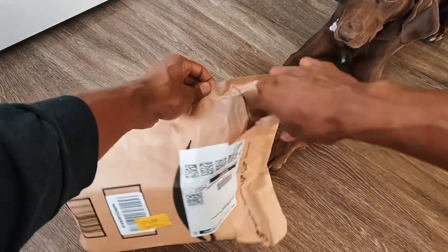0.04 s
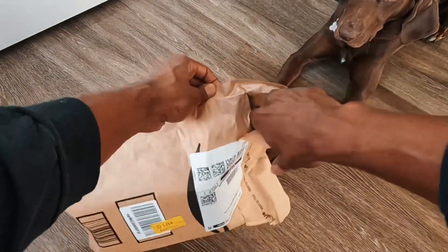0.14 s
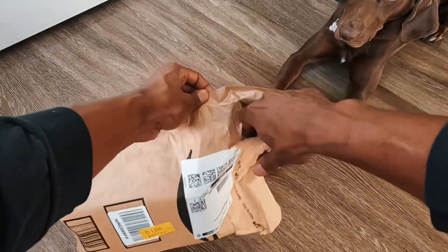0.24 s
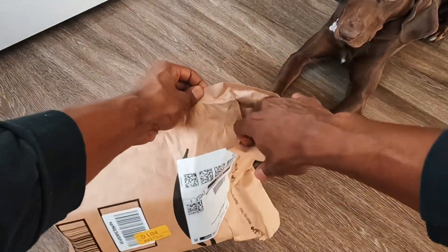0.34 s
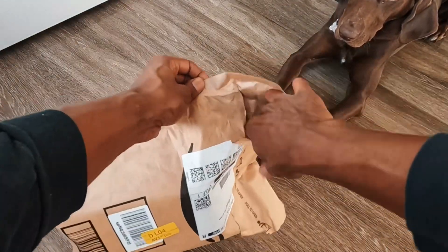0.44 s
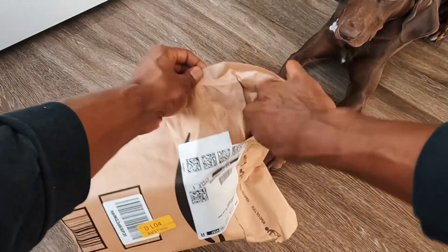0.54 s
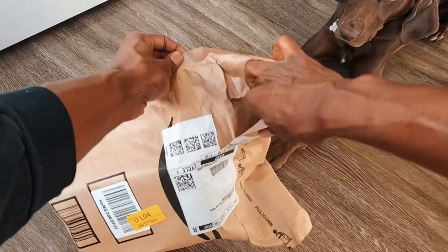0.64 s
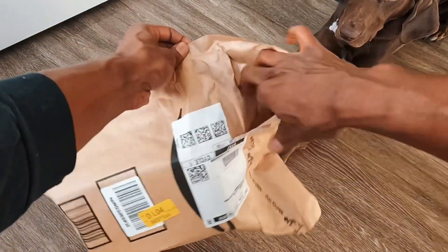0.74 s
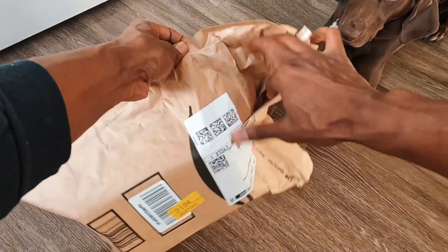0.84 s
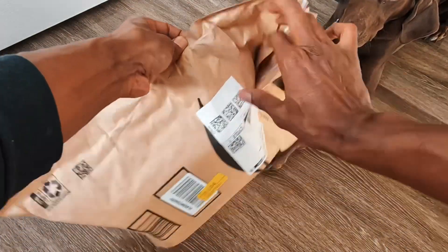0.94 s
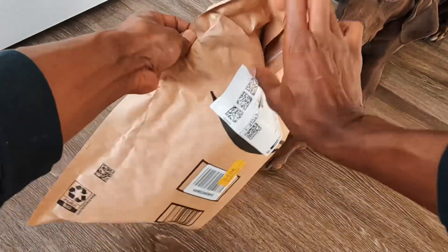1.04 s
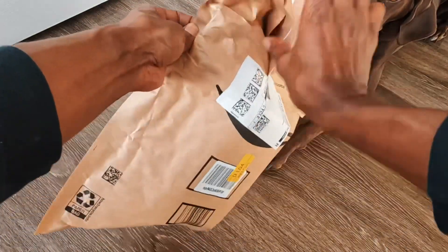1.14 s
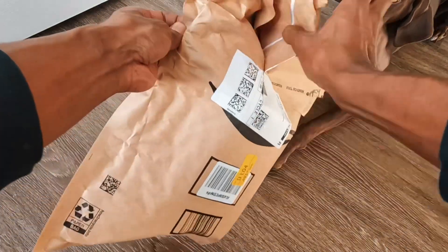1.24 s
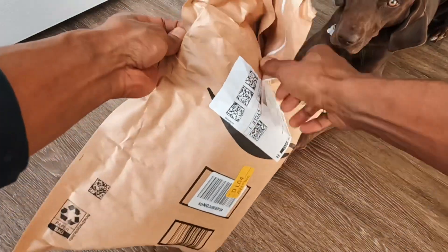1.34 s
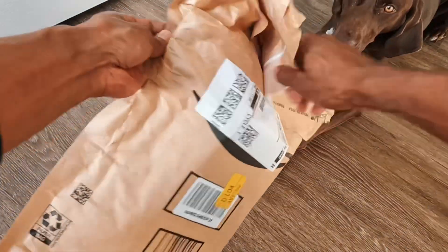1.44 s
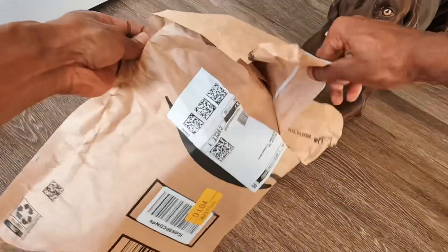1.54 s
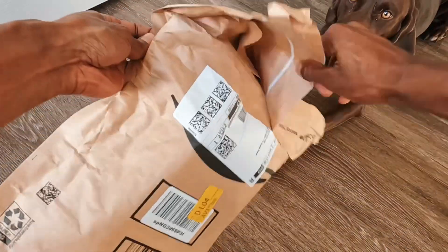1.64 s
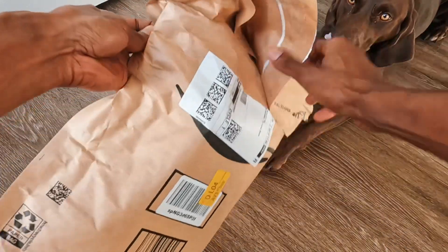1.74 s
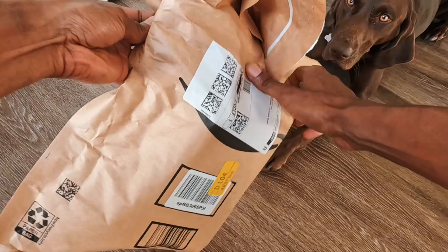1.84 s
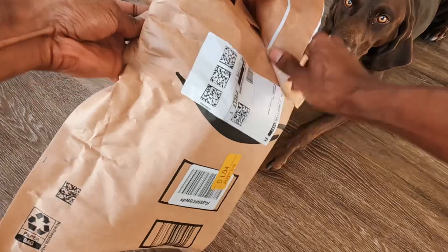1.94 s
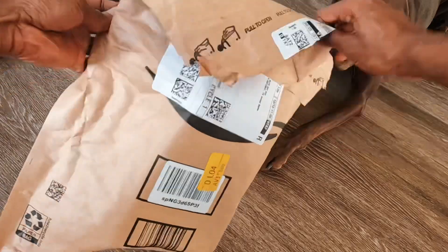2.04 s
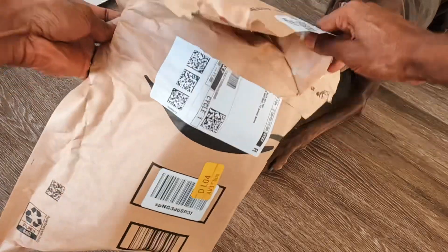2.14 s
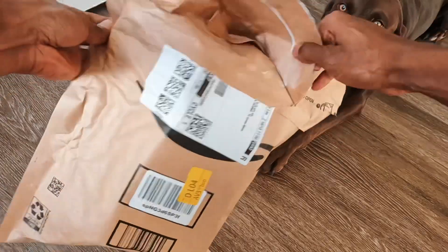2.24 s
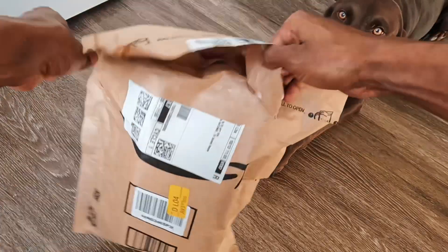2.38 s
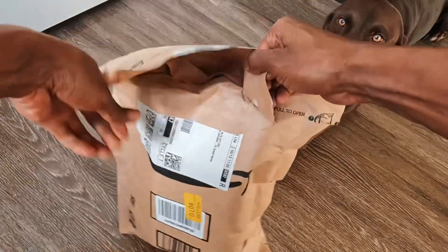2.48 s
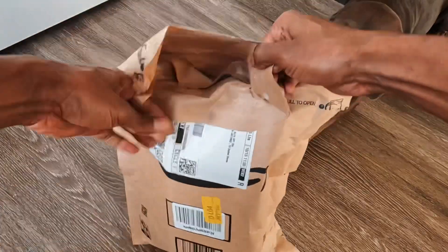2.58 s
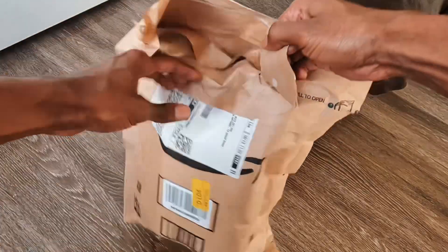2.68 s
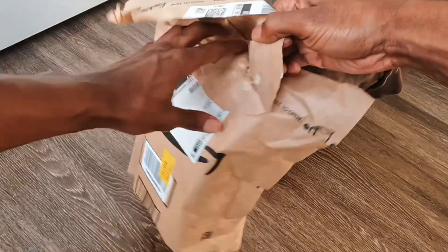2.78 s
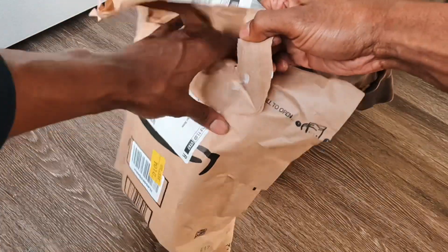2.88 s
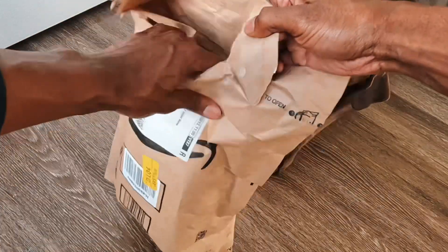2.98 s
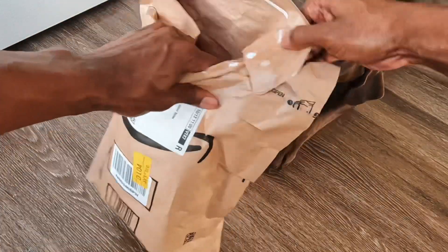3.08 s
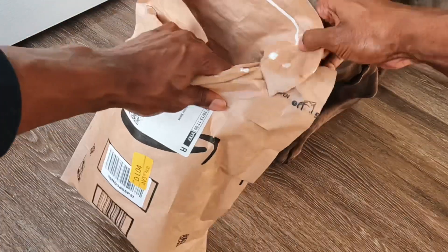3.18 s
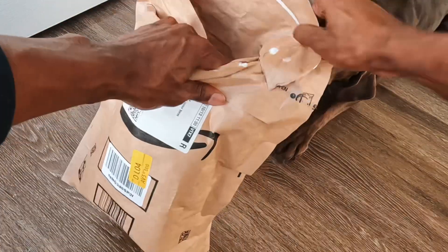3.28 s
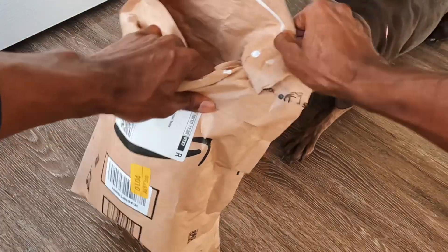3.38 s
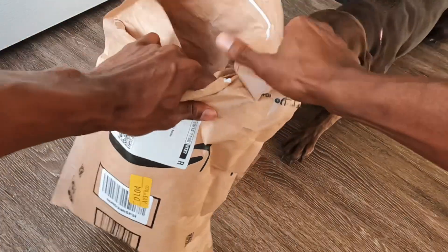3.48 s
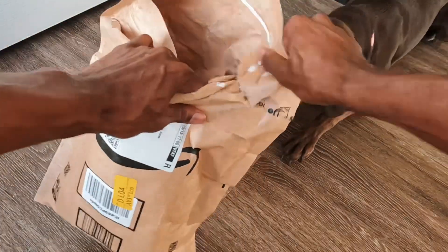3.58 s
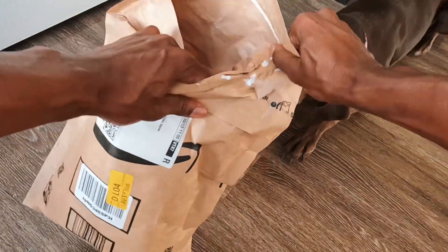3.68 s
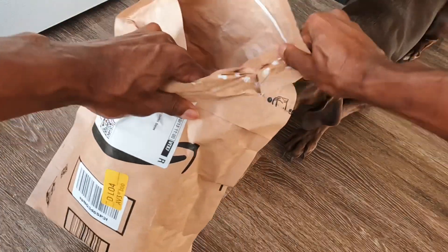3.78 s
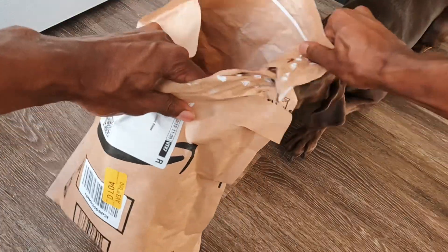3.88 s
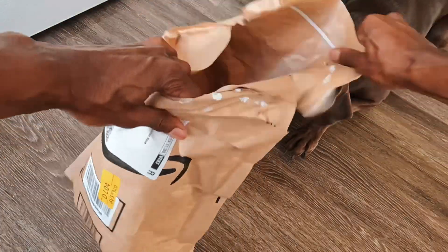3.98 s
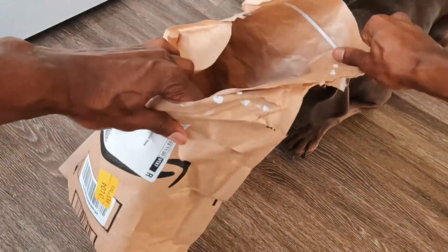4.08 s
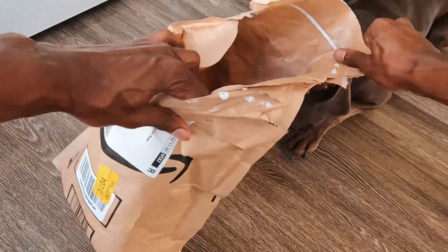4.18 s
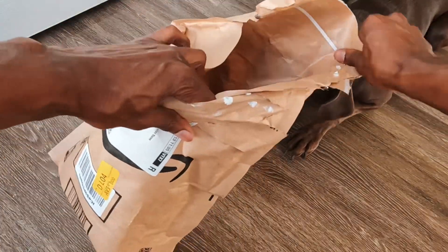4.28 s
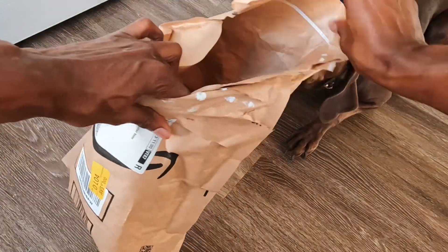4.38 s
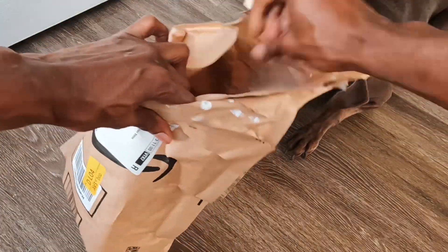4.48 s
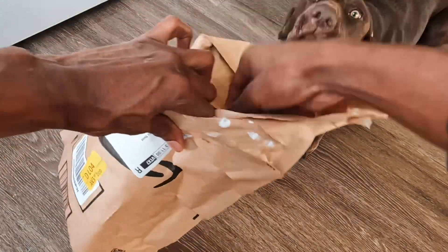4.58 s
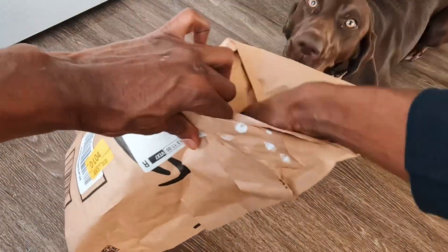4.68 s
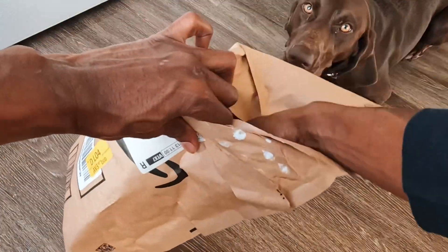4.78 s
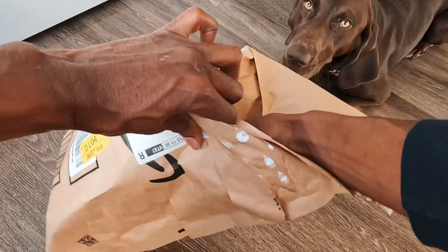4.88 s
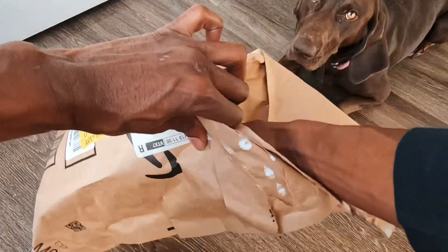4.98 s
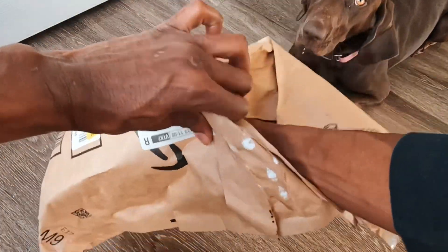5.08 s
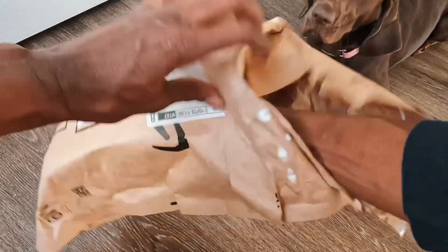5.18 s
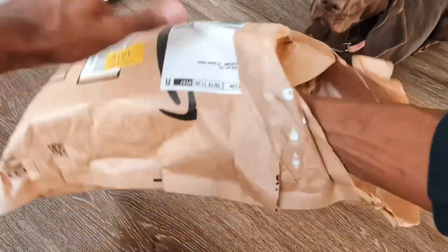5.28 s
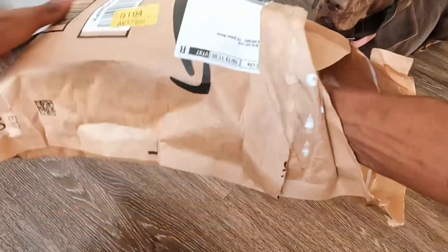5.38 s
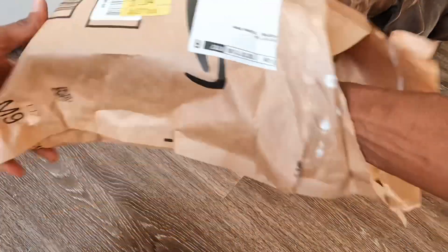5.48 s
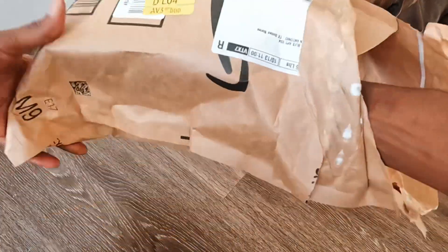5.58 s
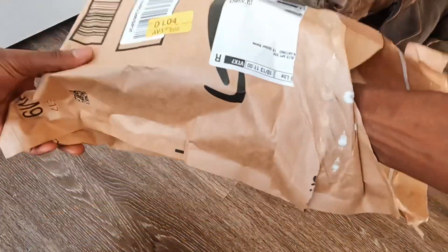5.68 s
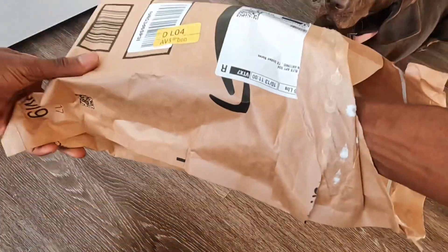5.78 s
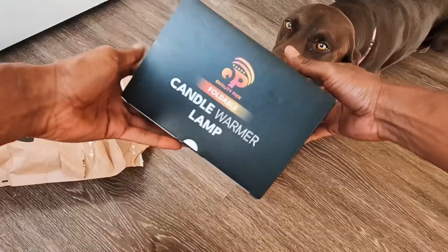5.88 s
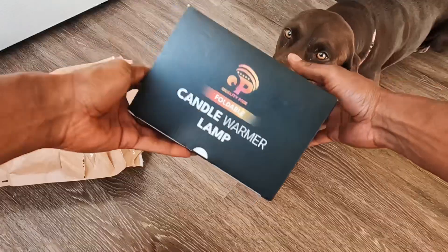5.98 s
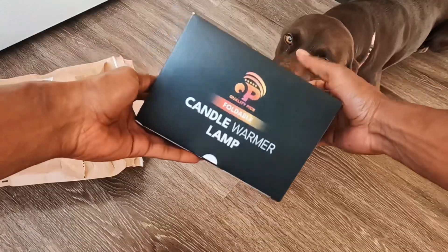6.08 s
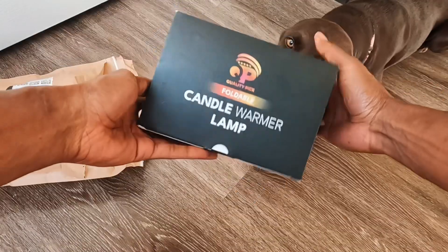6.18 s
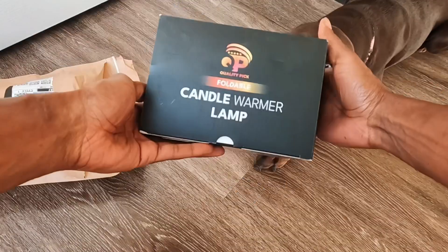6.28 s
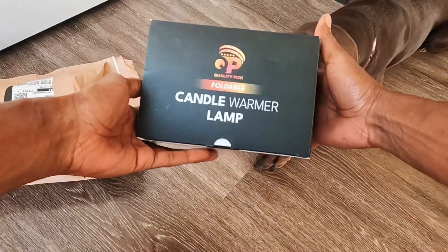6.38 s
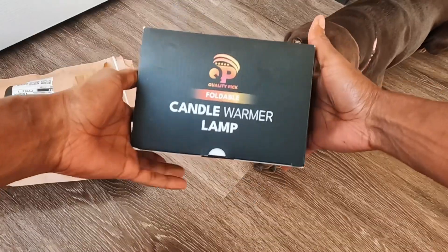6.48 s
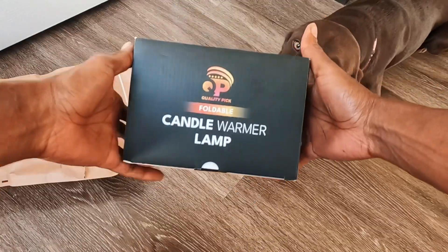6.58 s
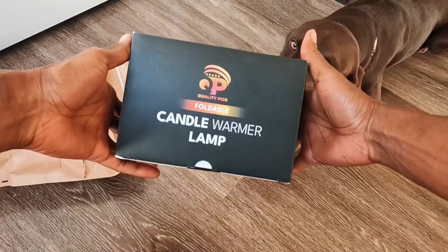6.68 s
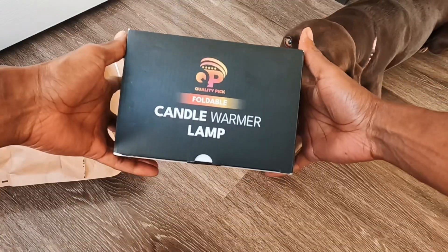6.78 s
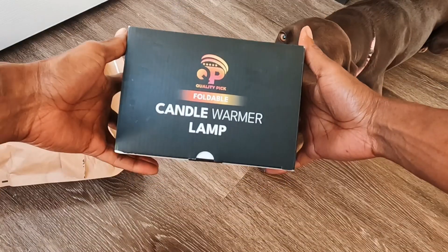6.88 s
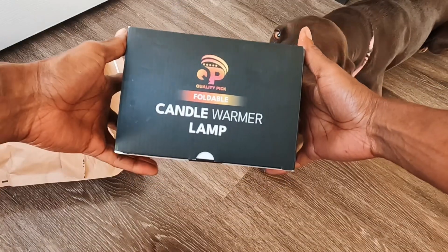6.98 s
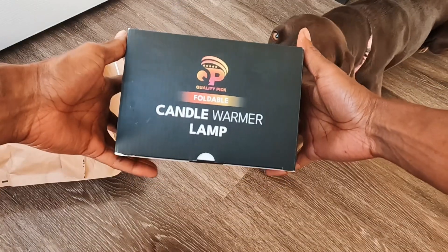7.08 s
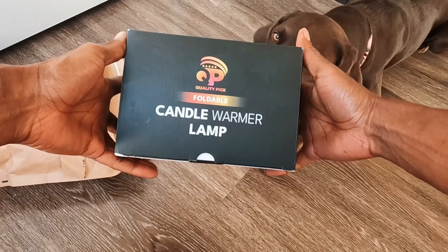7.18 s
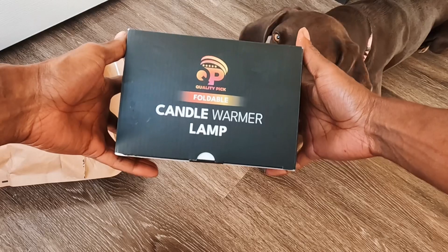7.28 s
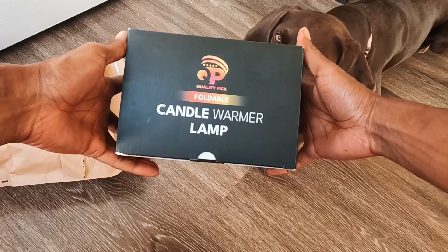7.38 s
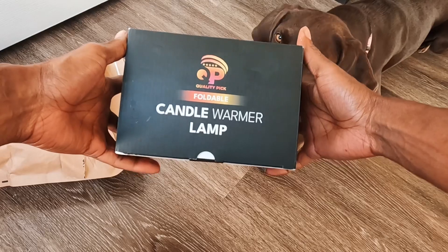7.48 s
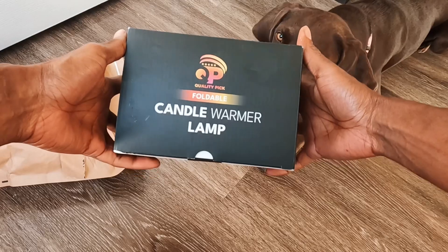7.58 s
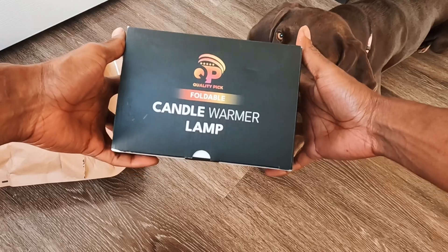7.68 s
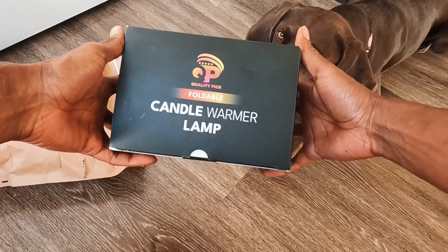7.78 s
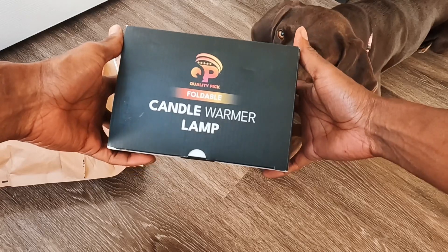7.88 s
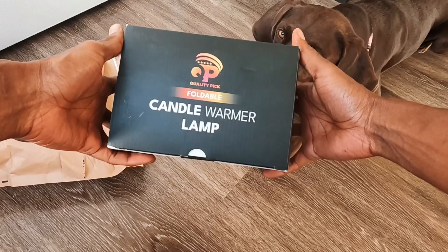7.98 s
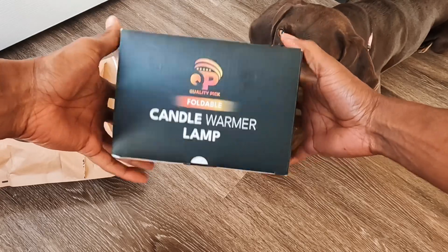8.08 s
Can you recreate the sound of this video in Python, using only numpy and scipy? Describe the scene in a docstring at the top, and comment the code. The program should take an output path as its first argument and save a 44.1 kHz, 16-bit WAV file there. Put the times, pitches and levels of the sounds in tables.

```python
"""Paper rustles and creases snap, close up in a quiet living room, over the low rumble of the air.
A stiff mailer is ripped open in short pulls (dense crackles of parting fibres) while its panels thud.
A hand rummages inside and draws out a cardboard box, which knocks once against the pouch;
then fingers slide and tap on the box. Sliding is noise and tiny clicks; snaps, thuds and taps are
short jolts that ring resonances."""
import sys
import numpy as np
from scipy import signal
from scipy.fft import rfft, irfft, next_fast_len
from scipy.io import wavfile

SR = 44100
rng = np.random.default_rng(int(sys.argv[2]) if len(sys.argv) > 2 else 0)


def materialize(psi):
    """Save the field psi as 16-bit PCM at rate SR to the path in sys.argv[1].

    A 1-D psi becomes a single channel; in a 2-D psi each row is a channel.
    """
    bounded = np.clip(np.atleast_2d(psi).T, -1, 1)
    quanta = np.round(bounded * 32767).astype(np.int16)
    wavfile.write(sys.argv[1], SR, quanta)


N = 358533
TIME = np.arange(N) / SR

# Hand strokes. Level is that of the middle band; body (lows) and brightness (highs) are relative to it.
# Each layer adds its own small trim later.
# pulls that tear the paper:
# (start [s], length [s], level [dB], swell over the pull [dB], body [dB], brightness [dB])
RIP_PULLS = [(0.597, 0.14, -28.5, -5, -8.5, -4.5), (1.508, 0.069, -23.5, 2.5, -6.5, -3.5),
             (1.992, 0.06, -31, 3, -10, -2), (2.057, 0.029, -23, 1, -6.5, -3),
             (3.013, 0.14, -30, 5, -12, -1.5), (3.197, 0.065, -31.5, -1, -5, 2),
             (3.626, 0.04, -29, 9.5, -14, -0.5), (3.781, 0.13, -28, 5, -10, -2),
             (3.964, 0.094, -25.5, -4.5, -3.5, -0.5)]
# hand movements that bend and rub the paper:
# (start [s], length [s], level [dB], swell [dB], body [dB], brightness [dB])
RUSTLE_STROKES = [(0.002, 0.13, -42, 6, -11, -8), (0.143, 0.14, -40.5, 0, -7, -6.5),
                  (0.336, 0.21, -36.5, -1, -5.5, -4.5), (0.748, 0.23, -41, -2, -0.5, -3),
                  (1.037, 0.14, -45.5, -9.5, -5, -7), (1.235, 0.092, -40.5, -11, -5, -2),
                  (1.357, 0.099, -48, -5.5, -3, 3), (1.619, 0.19, -43, -10.5, 0, -5),
                  (1.901, 0.054, -42.5, -5, 7.5, -5), (2.149, 0.19, -43.5, -13.5, -17, -6.5),
                  (2.345, 0.12, -39, 1.5, -3.5, 0), (2.525, 0.1, -40, -2.5, -3.5, 3),
                  (2.68, 0.047, -37.5, 0.5, 2, -1), (2.75, 0.032, -35.5, 2.5, 1, 3),
                  (2.82, 0.18, -36, -1.5, -3, -6.5), (3.27, 0.31, -42.5, -0.5, -7, -6.5),
                  (3.699, 0.042, -36, -6.5, -4.5, -7), (4.114, 0.16, -44, -5, -1, -1.5),
                  (4.305, 0.15, -46.5, 4, -1, -0.5), (4.538, 0.075, -42.5, -4, 1, 2.5),
                  (4.694, 0.13, -33, -2, -5, -6.5), (4.855, 0.2, -45, -1, 0, -6),
                  (5.075, 0.087, -39.5, -5.5, -4, -6.5), (5.19, 0.034, -36.5, 5.5, -1.5, -2),
                  (5.272, 0.13, -47.5, -7, 1.5, -3.5), (5.48, 0.11, -40.5, 13, 0.5, -2),
                  (5.64, 0.065, -37, 14, -4.5, -4), (5.753, 0.055, -40, 0, -3.5, -8.5)]
# fingers sliding on the box:
# (start [s], length [s], level [dB], swell [dB], body [dB], brightness [dB])
BOX_SLIDES = [(5.86, .04, -69, -8, -6, 16), (5.93, 0.17, -62.5, -5, -8, -5.5),
              (6.106, 0.032, -47, -4.5, -19, -3.5), (6.165, 0.056, -58, 3, -6, 5),
              (6.25, .015, -52.5, 2, -10, -7), (6.29, 0.13, -61, -2, -6, 0.5),
              (6.42, 0.23, -63.5, 11, -4, 7.5), (6.655, 0.11, -58.5, -3, 6, -7),
              (6.765, 0.006, -63.5, -11, 5, 8), (6.94, 0.042, -65.5, 0, -4, 0),
              (8.04, 0.1, -65, 9, -11, -2)]

# large creases snapping through, levels before the layer trim:
# (time [s], pouch pop [dB], crease crack [dB], crease pitch [Hz])
CREASE_SNAPS = [(0.1287, -26, -34, 2800), (0.1403, -28, -24, 5170), (0.1696, -23.5, -29.5, 4370),
                (0.177, -27, -29, 4300), (0.185, -41, -42, 5000), (0.206, -25, -30.5, 6000),
                (0.2174, -27, -41, 2600), (0.2273, -26, -28, 3520), (0.2337, -31, -33, 2840),
                (0.2946, -24, -34, 3630), (0.3277, -20, -27.5, 4300), (0.344, -27, -27.5, 3980),
                (0.402, -22.5, -25, 4950), (0.493, -24, -28.5, 5370), (0.575, -26.5, -34.5, 4800),
                (0.61, -27.5, -32.5, 4000), (0.627, -25, -30.5, 3500), (0.706, -30, -31, 5240),
                (0.6554, -15, -21, 4100), (0.7274, -24, -49, 5600), (0.782, -28.5, -34, 2910),
                (0.7927, -29, -32, 3000), (0.842, -28.5, -35, 3370), (0.8983, -28.5, -36, 3400),
                (0.917, -29, -32, 2590), (1.0225, -31, -32.5, 3050), (1.039, -21, -22.5, 5130),
                (1.046, -31, -22, 6560), (1.189, -21, -25.5, 5640), (1.209, -24.5, -32, 4370),
                (1.2157, -29.5, -20, 3480), (1.2436, -30.5, -44, 6100), (1.2547, -29.5, -20.5, 3770),
                (1.271, -24, -43.5, 2600), (1.2876, -26.5, -30.5, 3700), (1.431, -29, -38.5, 7500),
                (1.4706, -35, -37, 2670), (1.53, -26, -24.5, 4300), (1.581, -23, -28, 2580),
                (1.678, -27.5, -48, 3700), (1.8333, -22.5, -30, 3860), (1.841, -32.5, -38.5, 2400),
                (1.886, -25, -30, 2950), (1.893, -21, -25.5, 5200), (1.9433, -24.5, -28, 2970),
                (1.97, -37, -26, 4320), (1.9889, -29.5, -30.5, 3020), (2.02, -31.5, -26.5, 4500),
                (2.323, -32, -30.5, 3280), (2.3606, -23, -44, 4340), (2.448, -42, -23, 2500),
                (2.467, -25, -21.5, 4050), (2.531, -46, -33, 5630), (2.542, -45, -35, 3170),
                (2.6363, -23, -31, 2620), (2.6438, -23, -30.5, 3800), (2.676, -26.5, -26, 2540),
                (2.6863, -26.5, -26, 3900), (2.7006, -19, -33, 3770), (2.712, -20.5, -36, 2400),
                (2.7187, -24.5, -39, 3350), (2.7312, -20, -26, 3670), (2.7887, -21.5, -30, 4470),
                (2.8305, -18, -23, 2800), (2.9062, -26, -29.5, 3870), (2.935, -20.5, -24.5, 2960),
                (2.949, -34, -28.5, 3770), (2.9622, -27.5, -34, 5560), (3, -25, -30, 2400),
                (3.033, -32, -22, 2540), (3.0563, -20.5, -27, 2400), (3.1212, -18.5, -32, 3400),
                (3.133, -19, -31, 4350), (3.227, -18.5, -27, 3620), (3.246, -27.5, -27.5, 4200),
                (3.28, -22, -26.5, 2960), (3.3357, -32.5, -22.5, 3330), (3.347, -30, -20, 3300),
                (3.3699, -46, -29.5, 2500), (3.412, -46, -32, 5140), (3.4338, -46, -36.5, 6400),
                (3.4774, -26.5, -22, 3260), (3.5664, -30, -33, 2460), (3.628, -21, -27.5, 3120),
                (3.672, -22, -23, 2840), (3.8117, -19, -38, 2600), (3.835, -26, -30, 3000),
                (3.865, -28, -26, 4200), (3.871, -19.5, -30.5, 3000), (4.072, -19, -29, 3500),
                (4.2483, -30.5, -32.5, 3700), (4.4524, -27, -34, 4360), (4.586, -24, -44, 2680),
                (4.7387, -27, -33.5, 2404), (4.756, -24, -36, 2600), (4.814, -28.5, -35, 3000),
                (5.0972, -35, -24.5, 3740), (5.212, -35, -28.5, 3530), (5.347, -35, -39, 3020),
                (5.447, -32.5, -40, 3260), (5.451, -28, -32.5, 3360), (5.5767, -29, -21.5, 5040),
                (5.581, -23, -28, 3400), (5.5881, -25.5, -33, 4170), (5.6957, -26, -25, 3860),
                (5.7077, -21, -23.5, 4230), (5.718, -30, -21, 3430), (5.7445, -32, -43, 2500),
                (5.771, -27, -32, 2660), (5.803, -45, -38, 2400), (5.82, -28.5, -47, 2400),
                (5.828, -62, -33, 3876), (5.8423, -27, -24.5, 4830), (5.85, -59, -39, 3600)]
# whole panels of the pouch buckling, peaks before the layer trim: (time [s], peak [dB], pitch [Hz])
PANEL_THUDS = [(1.214, -18, 192), (1.223, -18.5, 57.5), (1.391, -22, 242), (1.552, -17.5, 123),
               (1.582, -18, 200), (1.609, -15.5, 362), (1.68, -13.5, 188), (1.843, -23.5, 260),
               (1.894, -21.5, 290), (1.97, -19.5, 215), (2.021, -17, 205), (2.062, -20, 227),
               (2.099, -15.5, 155), (2.467, -23.5, 235), (2.6428, -22, 298), (2.7133, -17, 285),
               (2.732, -24, 328), (2.829, -18, 170), (3.154, -23, 252), (3.495, -26, 260),
               (3.597, -24.5, 248), (3.897, -16.5, 200), (3.984, -20, 193), (4.039, -15.5, 52.4),
               (4.452, -29.5, 149), (4.545, -23, 250), (4.585, -21.5, 230), (4.748, -18.5, 332),
               (5.584, -17, 65.6), (5.72, -24, 259), (5.743, -21, 139)]
# the carton knocks the pouch, then fingertips touch it:
# (time [s], peak [dB], pitch [Hz], top of the contact [Hz])
BOX_TAPS = [(5.4697, -11, 1160, 2550), (6.213, -37, 1250, 5000), (6.247, -37, 3220, 9000),
            (6.288, -40, 1260, 6000), (6.33, -41, 1500, 6000), (6.439, -40.5, 695, 1100),
            (6.597, -38, 1240, 2200), (6.6147, -28.5, 1290, 3980), (6.6368, -27.5, 1230, 9000),
            (6.639, -25, 1230, 6000), (6.745, -41, 1020, 3006), (7.906, -40, 1113, 11030)]

# resonances of the pouch, later stretched to follow its main pitch: (frequency [Hz], width [Hz], gain [dB])
POUCH_RESONANCES = [(240, 74, -3), (632, 230, -6), (1110, 254, 1), (1706, 1020, -3.5), (2083, 1570, -10)]
# resonances of a pouch panel: (frequency [Hz], width [Hz], gain [dB])
PANEL_RESONANCES = [(103, 58, 4), (201, 56, 6.5), (248, 19, 5.5), (384.4, 110, -6)]
# resonances of the carton: (frequency [Hz], width [Hz], gain [dB])
BOX_RESONANCES = [(583, 360, 8.5), (1220, 230, -13), (2600, 700, 1.5), (4300, 2100, 10.5),
                  (6860, 2600, 12.5)]
# main resonance of the pouch as its hollow changes shape: (time [s], frequency [Hz])
POUCH_PITCH_CURVE = [(0, 1360), (.75, 1335), (1.2, 1185), (2.1, 1130), (2.7, 1090), (3.2, 1255),
                     (4.0, 1100), (4.75, 1220), (5.5, 1212)]
# taut paper hardly moves the low modes of the pouch, slack paper does: (time [s], low-mode gain [dB])
SLACK_CURVE = [(0, -0.5), (1.3, -2.5), (1.9, 2), (2.8, 2.5), (3.3, -4), (3.8, 5), (4.6, 4.5), (5.8, -6)]

# relative spectrum of the tear: (frequency [Hz], density [dB])
RIP_SPECTRUM = [(35, -31.5), (60, -4.5), (129, -5), (219, 0.5), (503, -7), (695, -3.5), (855, -6),
                (1210, -3.5), (1880, -6), (2150, -5.5), (2360, -7.5), (3580, -4.5), (7500, -9),
                (11400, -19), (15000, -33)]
# relative spectrum of the bending paper: (frequency [Hz], density [dB])
RUSTLE_SPECTRUM = [(35, -42), (60, -3), (117, -7), (151, -3), (219, -2), (263, -1), (503, -13), (633, -7.5),
                   (816, -9), (1210, -6), (1710, -9), (4310, -12.5), (7330, -17), (11900, -29.5),
                   (15000, -45.5)]
# relative spectrum of fingers on the carton: (frequency [Hz], density [dB])
SLIDE_SPECTRUM = [(500, 2.5), (830, -8), (1250, -7.5), (1700, -5.5), (2800, -7.5), (4200, -6.5),
                  (5300, -13.5), (7500, -3.5), (10000, -13.5), (12000, -13.5), (15000, -38)]
# relative spectrum of the room's rumble: (frequency [Hz], density [dB])
RUMBLE_SPECTRUM = [(15, -16), (23, -5), (29, -6), (37, -8), (55, -12.5), (90, -20.5), (140, -28),
                   (180, -16), (235, -22.5), (270, -17.5), (350, -26.5), (480, -36), (620, -38),
                   (790, -46.5), (1100, -38.5), (1500, -44), (2100, -49), (4300, -61), (5300, -70),
                   (7300, -62), (12000, -87)]
# shape of the scattered side signal, before its trim: (frequency [Hz], gain [dB])
SCATTER_WIDTH = [(60, -21.5), (280, -16.5), (540, -4.5), (1400, -10), (2800, -1), (4500, -15.5),
                 (8000, -48), (10500, -10.5), (13000, 7)]
# side against mid of the rumble: (frequency [Hz], gain [dB])
RUMBLE_SIDE = [(40, -33), (100, -26.5), (180, -19.5), (300, -20.5), (500, -10), (3000, -6.5)]
# steady tones of the ventilation and the mains: (frequency [Hz], rms level [dB])
HUM_TONES = [(28.5, -44.5), (120, -57)]

RUMBLE_DB = -43
BALANCE_DB, HEAD_ON_HZ = -1.3, 3000   # left against right in the lows; well above this both sides are equal
CUTOFF_HZ = 15100
# times to rise or fall by 20 dB
RIP_ATTACK_S, RIP_RELEASE_S = 0.042, 0.066
RUSTLE_ATTACK_S, RUSTLE_RELEASE_S = 0.07, 0.062
SLIDE_ATTACK_S, SLIDE_RELEASE_S = 0.013, 0.086
# small creases give way at random while the paper is worked
SMALL_SNAPS_PER_S = 30
SMALL_POP_DB, SMALL_CRACK_DB, SMALL_SPREAD_DB = 5, -4, 2.5   # against the stroke level, before the layer trim
SMALL_SNAP_HZ, SMALL_SPREAD_OCTAVES = 3470, .4
SMALL_SNAP_TOP_DB = -34.5   # stroke level above which work makes no larger small snaps
FACET_HOP_S = .06   # a new set of patches fades in this often
SHIVER_S = .0017   # energy decay time of the sheet's shiver after a fracture
SLACK_BELOW_HZ = 800


def from_db(db):
    """Decibels to gain."""
    return 10 ** (np.asarray(db) / 20)


def rms_one(x):
    """Scale to unit rms."""
    return x / np.sqrt(np.mean(x ** 2) + 1e-20)


def drift(rate):
    """Random wander of unit rms, with `rate` turning points drawn a second and straight lines between."""
    knots = rng.standard_normal(int(N / SR * rate) + 3)
    return rms_one(np.interp(TIME * rate, np.arange(len(knots)), knots))


def colour(x, spectrum):
    """Causal (minimum-phase) filter with the given spectrum."""
    size = 2 * next_fast_len(N // 2 + SR // 4)
    hz, db = np.transpose(spectrum)
    bins = np.maximum(np.arange(size // 2 + 1) * SR / size, 1)
    gain = from_db(np.interp(np.log(bins), np.log(hz), db))
    # folding the cepstrum onto positive time makes the filter minimum-phase
    cepstrum = irfft(np.log(gain))
    cepstrum[1:size // 2] *= 2
    cepstrum[size // 2 + 1:] = 0
    return irfft(rfft(x, size) * np.exp(rfft(cepstrum)))[:N]


def cut(x, hz, kind):
    """Fourth-order crossover filter."""
    sos = signal.butter(2, min(hz, .45 * SR), kind, fs=SR, output="sos")
    return signal.sosfilt(np.vstack([sos, sos]), x)


def resonate(x, modes):
    """Parallel resonances of alternating sign."""
    out = 0
    for k, (hz, width, db) in enumerate(modes):
        r = np.exp(-np.pi * width / SR)
        poles = [1, -2 * r * np.cos(2 * np.pi * hz / SR), r * r]
        gain = (-1) ** k * from_db(db) * (1 - r * r) / 2
        out = out + gain * signal.lfilter([1, 0, -1], poles, x)
    return out


def add(track, s, sound):
    """Mix a short sound in at time s."""
    start = max(0, round(s * SR))
    track[start:start + len(sound)] += sound[:N - start]


def echoes(x, t60, first_s):
    """Diffuse reflections of unit energy, the first after first_s."""
    t = TIME[:SR // 2]
    tail = rng.standard_normal(len(t)) * from_db(-60 * t / t60) * (t > first_s)
    return signal.fftconvolve(x, tail / np.linalg.norm(tail))[:N]


def strokes(rows, attack_s, release_s):
    """Strokes of a hand set in, swell or ease, and die away: level, body and brightness [dB] over time."""
    t, power = TIME[::32], 1e-12   # control rate, silent floor
    for start, length, db, swell_db, body_db, bright_db in rows:
        edges = np.maximum(start - t, 0) / attack_s + np.maximum(t - start - length, 0) / release_s
        swell = swell_db * (np.clip((t - start) / length, 0, 1) - .5)
        level = db + swell - 20 * edges
        power = power + from_db(level + np.array([[0], [body_db], [bright_db]])) ** 2
    middle, low, high = [np.interp(TIME, t, band) for band in 10 * np.log10(power)]
    return middle, low - middle, high - middle


def jolt(after, decay_s, linger=0.42, linger_s=0.0091, size=4000):
    """A click, a quick shiver (`after` against the click) and a faint lingering flutter of the sheet."""
    t = np.arange(size) / SR
    decays = np.exp(-t / np.array([[decay_s], [linger_s]]))
    shiver, flutter = rng.standard_normal((2, size)) * decays
    push = after * shiver / np.linalg.norm(shiver) + linger * flutter / np.linalg.norm(flutter)
    push[0] += 1
    return push * rng.choice([-1, 1])


def knock(db, hz, modes, after, decay_s, spot_db, spot_q, linger, top_hz=12000):
    """A blow rings the whole body and the struck spot at its own pitch; a soft contact loses the treble."""
    push = cut(jolt(after, decay_s, linger), top_hz, "low")
    whole = resonate(push, modes)
    spot = resonate(push, [(hz, hz / spot_q, 0)])
    blow = rms_one(whole) + from_db(spot_db) * rms_one(spot)
    return from_db(db) * blow / np.abs(blow).max()


def crackle(per_s, spread_db, hiss, clump_db, clump_rate, shiver=0.9):
    """Tiny fractures of very uneven size, each with a brief shiver, in clumps over a friction hiss."""
    sizes = from_db(spread_db * np.minimum(rng.exponential(1, N), 4)) * rng.choice([-1, 1], N)
    clicks = rms_one(sizes * (rng.random(N) < per_s / SR))
    # energy left in the sheet by recent fractures
    stored = signal.lfilter([1], [1, -np.exp(-1 / (SHIVER_S * SR))], clicks ** 2 + 1e-18)
    shivers = rms_one(np.sqrt(stored) * rng.standard_normal(N))
    grains = rms_one(clicks + shiver * shivers)
    clumps = from_db(clump_db * drift(clump_rate))
    return (grains + hiss * rng.standard_normal(N)) * clumps


def pouch_pitch(s):
    """Main resonance of the pouch [Hz] at time s."""
    return np.interp(s, *np.transpose(POUCH_PITCH_CURVE))


def facets(x, depth, q, hollow, hollow_width_hz=300, count=8):
    """Stiff patches between creases form, ring at their own pitches and vanish; the hollow rings behind."""
    hop = int(FACET_HOP_S * SR)
    out, fade = x.copy(), np.hanning(2 * hop)
    for i in range(0, N, hop):
        part = x[i:i + 2 * hop] * fade[:N - i]
        pitches = 1500 * 7 ** rng.random(count)   # 1.5 to 10.5 kHz
        patches = resonate(part, [(hz, hz / q, 0) for hz in pitches])
        cavity = resonate(part, [(pouch_pitch(i / SR), hollow_width_hz, 0)])
        add(out, i / SR, depth * patches + hollow * cavity)
    return out


def sheet(sound, level_db, body_db, bright_db, flicker_db):
    """Level the lows, middle and highs apart (slack gives body, taut gives treble); each band flickers."""
    low, upper = cut(sound, 600, "low"), cut(sound, 2500, "high")
    middle = cut(cut(sound, 600, "high"), 2500, "low")
    out = 0
    for part, db in [(low, body_db), (middle, 0), (upper, bright_db)]:
        flickering = part * from_db(flicker_db * drift(90))
        out = out + from_db(level_db + db) * rms_one(flickering)
    return out


def background():
    """Ventilation rumble as coloured noise, a deep drone and faint mains hum, nearly mono in the bass."""
    noises = rng.standard_normal((2, N))
    mid, side = [from_db(RUMBLE_DB) * rms_one(colour(white, RUMBLE_SPECTRUM)) for white in noises]
    hum = sum(from_db(db) * np.sqrt(2) * np.sin(2 * np.pi * hz * TIME) for hz, db in HUM_TONES)
    return mid + hum + colour(side, RUMBLE_SIDE) * [[1], [-1]]


def room(x):
    """A short dull tail in the middle; scatter off moving hands and the floor makes the sides differ."""
    tail = cut(echoes(x, t60=.22, first_s=.005), 9000, "low")
    mid = x + from_db(-19) * tail
    turn = np.pi * drift(3)   # wanders between two sets of reflections
    scatter = sum(share * echoes(x, t60=0.12, first_s=.001) for share in (np.cos(turn), np.sin(turn)))
    side = from_db(-6.5) * colour(scatter, SCATTER_WIDTH)
    return np.array([mid + side, mid - side])


def lean(pair):
    """Below the treble the right side is slightly louder."""
    lows = signal.lfilter(*signal.butter(1, HEAD_ON_HZ, fs=SR), pair)
    return pair + lows * (from_db([[BALANCE_DB / 2], [-BALANCE_DB / 2]]) - 1)


def box():
    """Fingers brush the smooth carton as grainy friction; a knock and fingertip taps ring its walls."""
    level_db, body_db, bright_db = strokes(BOX_SLIDES, SLIDE_ATTACK_S, SLIDE_RELEASE_S)
    grain = crackle(per_s=960, spread_db=2.5, hiss=1.6, clump_db=2.5, clump_rate=47)
    brushing = colour(grain, SLIDE_SPECTRUM)
    out = from_db(-2.5) * sheet(brushing, level_db, body_db, bright_db, flicker_db=0.5)
    for s, db, hz, top_hz in BOX_TAPS:
        tap = knock(db, hz, BOX_RESONANCES, after=0.86, decay_s=0.0035,
                    spot_db=2.0, spot_q=5.9, linger=0.37, top_hz=top_hz)
        add(out, s, tap)
    return out


def thuds():
    """A panel of the pouch buckles with a dull, short thump."""
    out = np.zeros(N)
    for s, db, hz in PANEL_THUDS:
        thump = knock(db, hz, PANEL_RESONANCES, after=0.69, decay_s=0.008,
                      spot_db=5.5, spot_q=5.3, linger=0.35, top_hz=1800)
        add(out, s, thump)
    return from_db(-4.0) * out


def rustle():
    """Crinkles over the hiss of paper on paper and skin; gentle movement is mostly smooth sliding."""
    level_db, body_db, bright_db = strokes(RUSTLE_STROKES, RUSTLE_ATTACK_S, RUSTLE_RELEASE_S)
    effort_db = np.clip(level_db + 31.0, -12, 6)
    sliding = 0.74 * from_db(-.6 * effort_db)
    crinkles = crackle(per_s=360, spread_db=2.0, hiss=sliding, clump_db=1.5, clump_rate=140)
    crinkles = crinkles / np.hypot(1, sliding)   # hiss changes the texture, not the level
    bending = colour(facets(crinkles, depth=0.63, q=20, hollow=0.38), RUSTLE_SPECTRUM)
    return from_db(-0.43) * sheet(bending, level_db, body_db + 0.4, bright_db + 0.15, flicker_db=1.06)


def small_snaps():
    """Small creases flip at random moments, as hard as the hands are working the paper."""
    work_db = strokes(RUSTLE_STROKES + RIP_PULLS, RUSTLE_ATTACK_S, RUSTLE_RELEASE_S)[0]
    level_db = np.minimum(work_db, SMALL_SNAP_TOP_DB)
    moments = np.flatnonzero((rng.random(N) < SMALL_SNAPS_PER_S / SR) & (level_db > -50))
    rows = []
    for i, (a, b, c) in zip(moments, rng.standard_normal((len(moments), 3))):
        pop_db = level_db[i] + SMALL_POP_DB + SMALL_SPREAD_DB * a
        crack_db = level_db[i] + SMALL_CRACK_DB + SMALL_SPREAD_DB * b
        rows.append((i / SR, pop_db, crack_db, SMALL_SNAP_HZ * 2 ** (SMALL_SPREAD_OCTAVES * c)))
    return rows


def pouch_modes_at(s, spread_db):
    """Pouch resonances at time s, stretched to its pitch, scattered by chance and weighted by slack."""
    chance = rng.standard_normal((len(POUCH_RESONANCES), 2))   # the pouch keeps changing shape
    stretch = pouch_pitch(s) / POUCH_RESONANCES[2][0]
    slack_db = np.interp(s, *np.transpose(SLACK_CURVE))
    modes = []
    for (hz, width, db), (a, b) in zip(POUCH_RESONANCES, chance):
        gain_db = db + spread_db * b + slack_db * (hz < SLACK_BELOW_HZ)
        modes.append((hz * stretch * np.exp(.06 * a), width, gain_db))
    return modes


def snaps(crease_q=5.5, broad_db=-11, reach=2.31, facet_db=3.5, shiver=0.78):
    """A crease flips: its small facet cracks at its own pitch and the pouch behind it pops."""
    out = np.zeros(N)
    span = np.sqrt(.005 * SR)   # levels are rms as if spread over 5 ms
    for s, pop_db, crack_db, hz in CREASE_SNAPS + small_snaps():
        push = jolt(after=shiver, decay_s=.0028)
        pop = resonate(push, pouch_modes_at(s, facet_db / 2))
        crack = resonate(push, [(hz, hz / crease_q, 0)]) + resonate(push, [(5800, 3500, broad_db)])
        crack = cut(crack, reach * hz, "low")   # a large, low facet flips slowly and makes little treble
        pop = from_db(pop_db) * pop / np.linalg.norm(pop)
        crack = from_db(crack_db) * crack / np.linalg.norm(crack)
        add(out, s, span * (pop + crack))
    return from_db(-2.5) * out


def rips():
    """Fibres part by the thousand each second along a running tear; a slow tear frees them one by one."""
    level_db, body_db, bright_db = strokes(RIP_PULLS, RIP_ATTACK_S, RIP_RELEASE_S)
    gentle = np.clip((-23.0 - level_db) / 8, .1, .9)
    running = crackle(per_s=2600, spread_db=3.5, hiss=0.3, clump_db=1.2, clump_rate=260)
    picking = crackle(per_s=750, spread_db=2.5, hiss=0.42, clump_db=1.0, clump_rate=410)
    fibres = np.sqrt(1 - gentle) * running + np.sqrt(gentle) * picking
    tearing = colour(facets(fibres, depth=0.87, q=24, hollow=0.39), RIP_SPECTRUM)
    return sheet(tearing, level_db, body_db + 0.74, bright_db + 0.3, flicker_db=1.1)


def scene():
    """Mailer and box close by in the room, over its rumble."""
    near = rips() + rustle() + snaps() + thuds() + box()
    return lean(room(near) + background())


def record(dry):
    """A steep low-pass cuts the top."""
    return signal.sosfilt(signal.ellip(10, .1, 90, CUTOFF_HZ, fs=SR, output="sos"), dry)


dry = scene()
out = record(dry)
materialize(out)
```